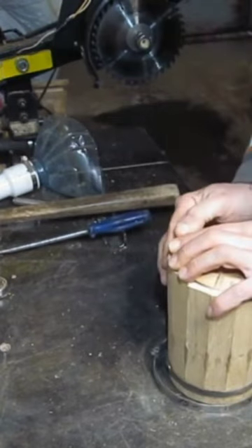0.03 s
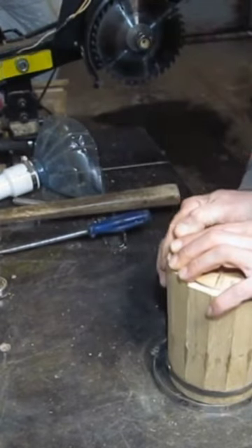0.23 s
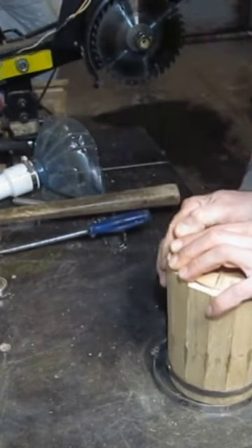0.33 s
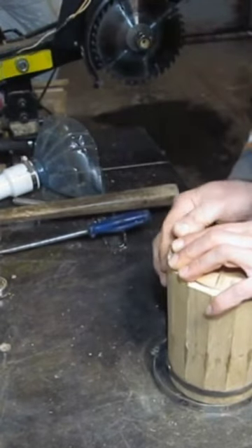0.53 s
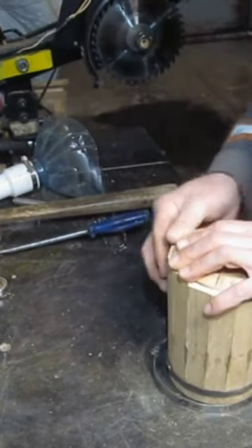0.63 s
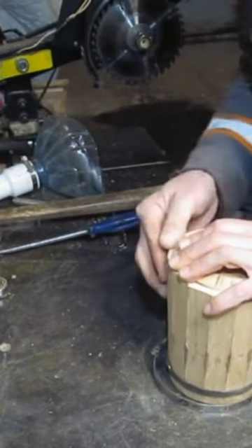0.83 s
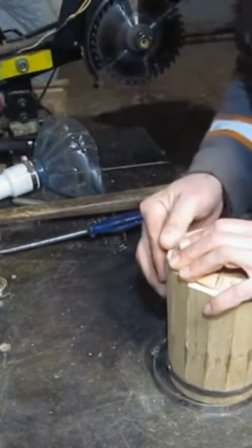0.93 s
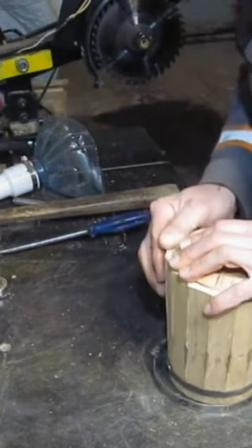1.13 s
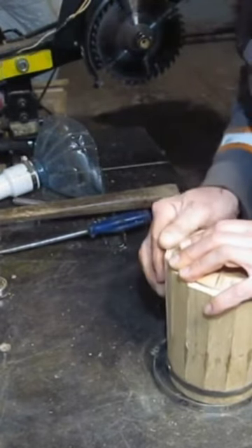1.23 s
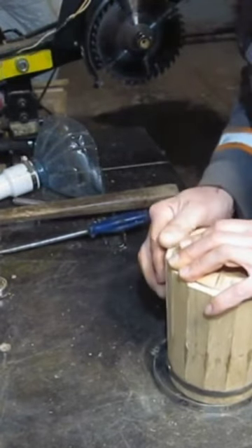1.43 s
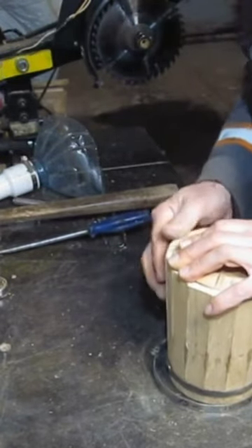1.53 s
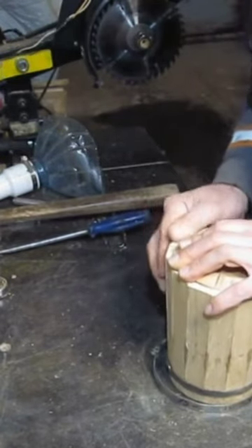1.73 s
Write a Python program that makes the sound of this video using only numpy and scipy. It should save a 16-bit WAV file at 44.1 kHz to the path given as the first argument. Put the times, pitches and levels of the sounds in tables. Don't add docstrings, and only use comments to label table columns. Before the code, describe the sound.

A wooden mug gets a soft tap, then one firm hollow knock with a short dying rattle; quieter taps, hand rubs and small shuffles on a bench follow, close in stereo in a quiet, faintly humming workshop.

```python
import sys
import numpy as np
from scipy import signal
from scipy.fft import rfft, irfft, next_fast_len
from scipy.io import wavfile
from scipy.ndimage import uniform_filter1d

SR = 44100
rng = np.random.default_rng(int(sys.argv[2]) if len(sys.argv) > 2 else 0)


def store_pcm(level_fs):
    pcm = np.round(np.clip(level_fs, -1, 1) * 32767).astype(np.int16)
    wavfile.write(sys.argv[1], SR, np.atleast_2d(pcm).T)


def voltage_ratio(level):
    return 10 ** (np.asarray(level, float) / 20)


N = 79380

# frequency in Hz, density in dB per Hz.
AIR_SPECTRUM = [(20, -15), (90, -5), (250, -6), (600, -6), (1200, -5.5), (2500, -14.5), (8000, -23.5),
                (15000, -27)]
# frequency in Hz, likeness from 0 to 1.
LIKENESS = [(40, 0.38), (200, 0.43), (600, 0.55), (1600, 0.36), (5000, 0.063), (14000, .1)]
# start in seconds, rise in seconds, fall in seconds, level in dB.
RUB_STROKES = [(-.1, 0.077, 0.12, -54.5), (.115, 0.0063, 0.13, -57), (.335, 0.031, 0.019, -55),
               (.43, 0.029, 0.11, -59), (.514, 0.0065, 0.099, -49.5), (.57, 0.068, 0.041, -49),
               (.6, 0.067, 0.076, -49), (.97, 0.016, 0.22, -60.5), (1.386, 0.0035, 0.063, -54),
               (1.4, 0.063, 0.12, -63), (1.485, 0.037, 0.087, -49.5), (1.55, 0.049, 0.05, -54.5),
               (1.65, 0.017, .15, -59)]
# frequency in Hz, density in dB per Hz.
SKIN_SPECTRUM = [(300, -6.5), (700, 0.5), (1500, -3), (3000, -5.5), (5000, -9.5), (7000, -15.5),
                 (10000, -23), (15000, -38)]
# frequency in Hz, width in Hz, gain in dB.
RUB_PEAKS = [(3170, 2400, 3), (6420, 840, 3)]
# start in seconds, rise in seconds, fall in seconds, level in dB, pitch in Hz.
SINGING = [(.52, .02, .04, -59, 1930), (.52, .02, .04, -62, 4200), (.64, .04, .03, -58, 1770),
           (.62, .04, .05, -61, 2420), (.625, .035, .045, -59, 4050), (1.5, .025, .04, -61, 2420),
           (1.5, .025, .045, -58, 3080), (1.49, .04, .04, -64, 6600), (1.505, .025, .035, -69, 5600),
           (1.575, .025, .025, -63, 3340), (1.575, .025, .025, -63, 3790), (1.57, .03, .02, -63, 6520)]
# start in seconds, rise in seconds, fall in seconds, level in dB.
HOLLOW_STROKES = [(-.05, 0.034, 0.048, -53.5), (.33, .02, 0.028, -63), (.6, 0.022, 0.024, -57),
                  (.66, 0.018, .035, -53), (1.42, 0.057, .06, -61), (1.49, .04, 0.08, -57.5),
                  (1.55, 0.03, 0.048, -50), (1.685, .015, 0.03, -61), (1.735, 0.017, .05, -51.5)]
# start in seconds, rise in seconds, fall in seconds, level in dB.
SHUFFLE_STROKES = [(-.05, 0.027, 0.16, -58.5), (.125, 0.014, 0.29, -50.5), (.34, 0.0053, 0.092, -55.5),
                   (.525, 0.0048, 0.07, -53.5), (.6, 0.016, 0.05, -53.5), (.67, 0.026, 0.044, -53),
                   (.83, 0.0063, 0.14, -62.5), (.99, 0.043, 0.088, -59.5), (1.39, 0.0098, 0.088, -83),
                   (1.72, 0.052, 0.058, -63)]
# frequency in Hz, level in dB, T60 in seconds.
BENCH_MODES = [(185, 0, 0.046), (268, 1, 0.028), (400, -1, 0.028), (560, -4, 0.14)]
# start in seconds, strength in dB, pitch in Hz, T60 in seconds.
TAP_NOTES = [(.1182, -26, 400, 0.014), (.1205, -39.5, 835, 0.056), (.123, -41, 759, 0.039),
             (.129, -46.5, 623, 0.022), (.1395, -47, 710, .04), (.149, -46, 660, 0.02),
             (0.1177, -39.5, 1430, 0.0095), (0.1197, -37.5, 1155, 0.027), (.3635, -42.5, 574, .04),
             (.3625, -45.5, 780, 0.048), (.5168, -31.5, 560, 0.0057), (.5193, -26.5, 454, 0.014),
             (.52, -30.5, 185, 0.082), (.828, -36.5, 207, 0.05), (0.829, -39.5, 523, 0.014),
             (0.9826, -41, 427, 0.045), (.987, -43, 608, 0.044), (1.029, -45.5, 395, 0.038),
             (1.047, -48, 412, 0.056), (1.072, -46, 550, 0.044), (1.089, -37, 297, 0.006),
             (1.233, -53.5, 400, 0.04), (1.3885, -41, 456, 0.02), (1.393, -40, 408, 0.036),
             (1.393, -39, 351, 0.063), (1.39, -43, 558.6, 0.076), (1.401, -53, 580, 0.022)]
# start in seconds, peak in dB, pitch in Hz, T60 in seconds.
STAVE_NOTES = [(.1185, -41.5, 2110, 0.018), (.1185, -47.5, 2760, 0.021), (.119, -50, 3420, 0.036),
               (.119, -51, 4060, 0.023), (.119, -51, 5070, 0.017), (0.1203, -61, 6830, 0.028),
               (.2005, -33, 1850, .015), (0.2033, -29.5, 1340, 0.013), (0.207, -32, 1750, 0.036),
               (.2065, -30, 1924, 0.029), (0.2075, -57, 2220, 0.022), (.206, -36.5, 2760, 0.027),
               (0.204, -39, 3133, 0.024), (.2055, -37, 3763, .03), (.206, -44, 4500, .025),
               (.2055, -42, 5373, .025), (.2055, -46, 6600, .02), (.2055, -48, 8300, .016),
               (.2055, -47, 9800, .014), (.3611, -44, 2390, .022), (.3611, -46, 2750, .02),
               (.3611, -42, 3120, .022), (.3611, -49, 3900, .018), (.3611, -56, 5290, .014),
               (.4562, -56, 2600, .015), (.5175, -44, 1750, .03), (.518, -45, 2130, .03),
               (.517, -52, 3200, .012), (.5172, -45, 3950, .02), (.519, -55, 5590, .01),
               (.519, -56, 6470, .016), (.518, -64, 10000, .008), (.984, -53, 1700, .015),
               (.9818, -46, 2870, .02), (.9818, -50, 3190, .02), (.985, -60, 5410, .012),
               (1.215, -60, 3000, .01), (1.3876, -54, 2900, .014), (1.3895, -57, 4700, .012),
               (1.3902, -54.5, 6500, 0.016), (1.392, -60, 7200, .016), (1.39, -61, 9800, .012),
               (1.5144, -46, 3030, 0.011)]
# start in seconds, strength in dB, contact in seconds.
KNOCKS = [
    (0.1987, -36.5, 0.00083),
    (.2053, -17.5, 0.00098),
]
# frequency in Hz, level in dB, T60 in seconds.
MUG_MODES = [(320, -9, .03), (362, -8, 0.059), (399, 4.5, 0.026), (463, -16, 0.3), (572.3, -6, .12),
             (646.6, -6, 0.093), (682, 1.5, 0.067), (769, -1.5, 0.055), (831, -13.5, 0.14),
             (867.6, -3.5, 0.16), (895.6, 3.5, 0.055), (980, -1, 0.041), (1109, -3, 0.081),
             (1290, -4, 0.026)]
# band centre in Hz, level in dB, T60 in seconds.
RATTLE_BANDS = [(110, -39, 0.36), (181, -32, .25), (317, -31, 0.16), (397, -38, 0.2), (680, -23.5, 0.18),
                (900, -34, 0.32), (1260, -36.5, 0.21), (1880, -27, 0.035), (2970, -60, 0.1),
                (4600, -47, 0.077), (7000, -60, 0.036), (10000, -67, .03)]
# frequency in Hz, left over right in dB.
PORT_TILT = [(60, -5), (180, -2), (540, -2.0), (1620, -3.5), (4860, -1), (14600, 3.5)]
# frequency in Hz, width in Hz, depth from 0 to 1.
HOUSING_DIPS = [(6190, 140, 1), (8070, 450, 0.44), (11130, 300, 0.7)]

AIR_DB, AIR_LEFT_DB = -56.5, -1.07
HUM_HZ, HUM_WIDTH_HZ, HUM_DB, HUM_WAVER_PER_S = 978, 56, -61.5, 1.6
SLIPS_PER_S, RUB_STUTTER_DB, SING_WIDTH_HZ = 5400, 1.5, 76
SHEEN_HZ, SHEEN_DB, SHEEN_FULL_DB = 7600, 3.0, -45.5
HOLLOW_HZ, HOLLOW_WIDTH_HZ = 680, 70
TAP_CONTACT_S, THUMP_RISE_T60_S = 0.00084, 0.0048
TICK_RISE_S, TICK_ROUGH = 0.0006, 0.45
KNOCK_THUMP_HZ, KNOCK_THUMP_DB, KNOCK_THUMP_T60_S = 560, -13.5, 0.016
RATTLE_RISE_S = 0.006
RADIATES_ABOVE_HZ = 277
ROOM_T60_S, WALL_CUT_HZ, ROOM_DB = 0.32, 2450, -16
ROOM_SPREAD_HZ, SPREAD_DB = 810, -0.5
TREBLE_CUT_HZ = 9470
OPPOSITE = np.array([[1], [-1]])


def rms_one(x):
    return x / np.sqrt(np.mean(x ** 2) + 1e-20)


def at_hz(points, hz):
    table = np.array(points)
    return np.interp(np.log(hz), np.log(table[:, 0]), table[:, 1])


def drift(rate):
    r = np.exp(-80 * np.pi * rate / SR)
    white = rng.standard_normal(N // 40 + 2002)
    slow = signal.lfilter([1], [1, -2 * r, r * r], white)[2000:]
    return np.interp(np.arange(N) / 40, np.arange(len(slow)), rms_one(slow))


def ring(force, hz, t60):
    r, w = voltage_ratio(-60 / (t60 * SR)), 2 * np.pi * hz / SR
    return signal.lfilter([0, np.sin(w)], [1, -2 * r * np.cos(w), r * r], force + 1e-18)


def resonance(x, hz, width_hz):
    r = np.exp(-np.pi * width_hz / SR)
    zeros = np.array([1, 0, -1]) * (1 - r * r) / 2
    return signal.lfilter(zeros, [1, -2 * r * np.cos(2 * np.pi * hz / SR), r * r], x)


def contact(s, length_s):
    phase = (np.arange(N) / SR - s) / length_s
    return -np.sin(np.pi * np.clip(phase, 0, 1)) ** 2 * 2 / (length_s * SR)


def thump(force, hz, t60):
    swing = ring(ring(force, hz, THUMP_RISE_T60_S), hz, t60)
    return swing / np.abs(swing).max()


def grains(per_s, spread, count=1):
    shape = (count, N)
    size = voltage_ratio(spread * np.minimum(rng.exponential(1, shape), 4))
    sign = rng.choice([-1, 1], shape)
    return size * sign * (rng.random(shape) < per_s / SR)


def strokes(rows):
    t, power = np.arange(N) / SR, 1e-12
    for s, rise, fall, db in rows:
        shape = np.clip(np.minimum((t - s) / rise, 1 - (t - s - rise) / fall), 0, 1)
        power = power + voltage_ratio(2 * db) * np.sin(np.pi / 2 * shape) ** 4
    return np.sqrt(power)


def banded(white, spectrum, patchy_db):
    out, edges = 0, 20 * 2 ** np.arange(0, 9.8, 0.4)
    for k, (low, high) in enumerate(zip(edges, edges[1:])):
        band = signal.butter(2, [low, high], "band", fs=SR, output="sos")
        mid, side = signal.sosfilt(band, white[k % 2])
        hz = np.sqrt(low * high)
        alike = np.clip(at_hz(LIKENESS, hz), 0, 1)
        level = voltage_ratio(at_hz(spectrum, hz) + patchy_db * drift(42.0))
        out = out + level * (np.sqrt(1 + alike) * mid + np.sqrt(1 - alike) * side * OPPOSITE)
    return rms_one(out)


def room_tone():
    hum = resonance(rng.standard_normal((2, N)), HUM_HZ, HUM_WIDTH_HZ)
    hum = resonance(hum, HUM_HZ, 2 * HUM_WIDTH_HZ)
    hum = rms_one(hum[0] + 0.87 * hum[1] * OPPOSITE)
    hiss = banded(rng.standard_normal((2, 2, N)), AIR_SPECTRUM, patchy_db=1.0)
    return voltage_ratio(AIR_DB) * hiss + voltage_ratio(HUM_DB + 2 * drift(HUM_WAVER_PER_S)) * hum


def rub():
    slips = grains(SLIPS_PER_S, spread=2.5, count=4).reshape(2, 2, N)
    hiss = banded(slips, SKIN_SPECTRUM, patchy_db=2.0)
    peaks = sum((voltage_ratio(db) - 1) * resonance(hiss, hz, width) for hz, width, db in RUB_PEAKS)
    hiss = rms_one(hiss + peaks)
    speed = strokes(RUB_STROKES) * voltage_ratio(RUB_STUTTER_DB * drift(26.0))
    treble = signal.lfilter(*signal.butter(2, SHEEN_HZ, "high", fs=SR), hiss)
    sheen = voltage_ratio(SHEEN_DB) * speed / voltage_ratio(SHEEN_FULL_DB) * treble
    white = rng.standard_normal((2, N))
    white = white + white[0]
    notes = 0
    for *row, hz in SINGING:
        tone = resonance(resonance(white, hz, SING_WIDTH_HZ), hz, 3 * SING_WIDTH_HZ)
        notes = notes + strokes([row]) * rms_one(tone)
    return speed * (hiss + sheen) + notes


def hollow():
    air = resonance(grains(3300, spread=1.45)[0], HOLLOW_HZ, HOLLOW_WIDTH_HZ)
    air = resonance(air, HOLLOW_HZ, 3 * HOLLOW_WIDTH_HZ)
    return strokes(HOLLOW_STROKES) * rms_one(air)


def shuffle():
    bumps = signal.lfilter([0.1], [1, -0.9], grains(300, spread=2.53, count=4))
    bench = 0
    for k, (bump, (hz, db, t60)) in enumerate(zip(bumps, BENCH_MODES)):
        bench = bench + voltage_ratio(db) * (-1) ** k * ring(bump, hz, t60)
    return strokes(SHUFFLE_STROKES) * rms_one(bench)


def taps():
    return sum(voltage_ratio(db) * thump(contact(s, TAP_CONTACT_S), hz, t60) for s, db, hz, t60 in TAP_NOTES)


def cracks():
    out, size = np.zeros((2, N)), SR // 8
    turns = rng.random((60, 2, 1))
    grit = uniform_filter1d(rng.standard_normal((60, 2, size)), size=24) * np.sqrt(24)
    for (s, db, hz, t60), turn, rough in zip(STAVE_NOTES, turns, grit):
        first = int(s * SR) + 1
        age = (first + np.arange(size)) / SR - s
        phase = 2 * np.pi * (hz * age + turn[0] + turn * [[0], [0.25]])
        envelope = voltage_ratio(db - 60 * age / t60) * (1 - np.exp(-age / TICK_RISE_S))
        out[:, first:first + size] += envelope * 2 * (1 + TICK_ROUGH * rough) * np.sin(phase)
    return out


def knock():
    s = KNOCKS[1][0]
    force = sum(voltage_ratio(db) * contact(start, length) for start, db, length in KNOCKS)
    body = 0
    for k, (hz, db, t60) in enumerate(MUG_MODES):
        body = body + voltage_ratio(db) * (-1) ** k * ring(force, hz, t60)
    age, white = np.clip(np.arange(N) / SR - s, 0, 1), rng.standard_normal((2, 2, N))
    rattle = 0
    for k, (hz, db, t60) in enumerate(RATTLE_BANDS):
        noise = rms_one(resonance(resonance(white[k % 2], hz, hz * 0.58), hz, hz * 0.71))
        rattle = rattle + voltage_ratio(db - 60 * age / t60) * (1 - np.exp(-age / RATTLE_RISE_S)) * noise
    return rattle + body + voltage_ratio(KNOCK_THUMP_DB) * thump(force, KNOCK_THUMP_HZ, KNOCK_THUMP_T60_S)


def workshop(x):
    size = next_fast_len(N + SR)
    spectrum, w = rfft(x, size), 2 * np.pi * np.arange(size // 2 + 1) / size
    dull = 1 / (1 + 1j * w * SR / (2 * np.pi * WALL_CUT_HZ))
    out = np.zeros((2, N))
    for k, lag in enumerate(rng.uniform(0.006, 0.03, 16) * SR):
        loop = voltage_ratio(-60 * lag / SR / ROOM_T60_S) * dull * np.exp(-1j * w * lag)
        out[k % 2] += irfft(spectrum * loop / (1 - loop), size)[:N] * (-1) ** (k // 2)
    return out


def ports(x):
    half = voltage_ratio(at_hz(PORT_TILT, np.arange(N // 2 + 1) * SR / N + 1) / 2)
    return irfft(rfft(x) * np.array([half, 1 / half]), N)


def scene():
    radiate = signal.butter(3, RADIATES_ABOVE_HZ, "high", fs=SR, output="sos")
    struck = signal.sosfilt(radiate, knock() + taps() + cracks())
    mug = struck + hollow() + shuffle() + rub()
    left, right = mug + voltage_ratio(ROOM_DB) * workshop(mug.mean(axis=0))
    difference = signal.lfilter(*signal.butter(2, ROOM_SPREAD_HZ, "high", fs=SR), left - right)
    side = voltage_ratio(SPREAD_DB) * difference / 2
    return ports((left + right) / 2 + side * OPPOSITE) + room_tone() * voltage_ratio(AIR_LEFT_DB * OPPOSITE)


def top_cut(x):
    return signal.sosfilt(signal.butter(12, 15170, fs=SR, output="sos"), x)


def record(dry):
    for hz, width, depth in HOUSING_DIPS:
        dry = dry - np.clip(depth, 0, 1) * resonance(dry, hz, width)
    mix = signal.lfilter(*signal.butter(2, TREBLE_CUT_HZ, fs=SR), dry)
    return top_cut(mix)


dry = scene()
out = record(dry)
store_pcm(out)
```